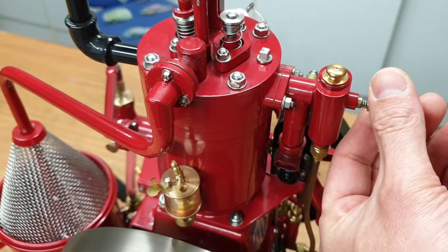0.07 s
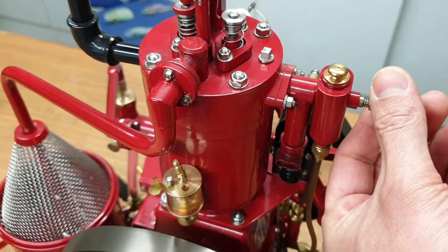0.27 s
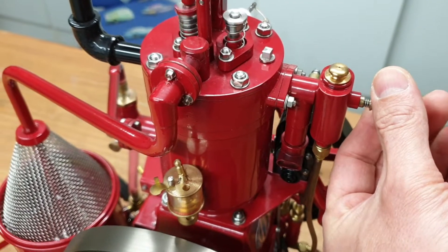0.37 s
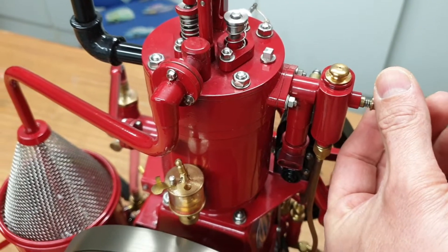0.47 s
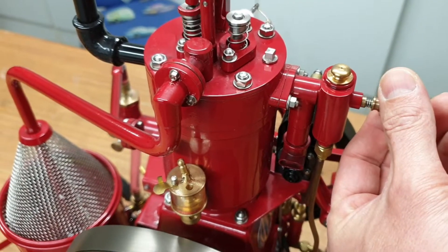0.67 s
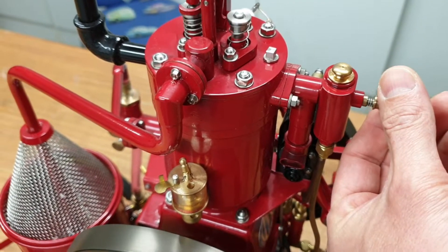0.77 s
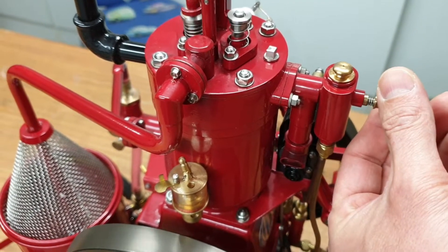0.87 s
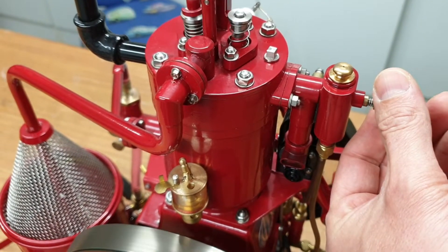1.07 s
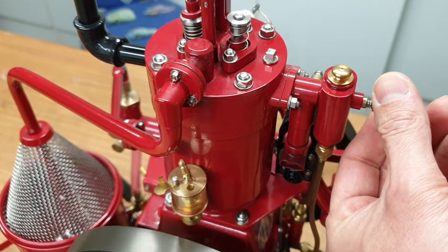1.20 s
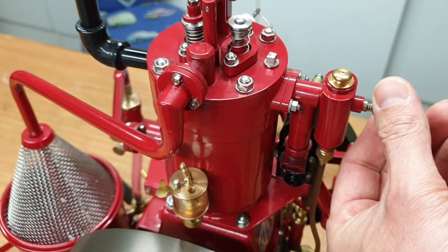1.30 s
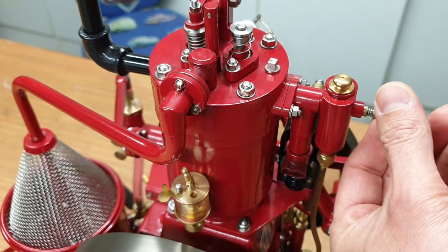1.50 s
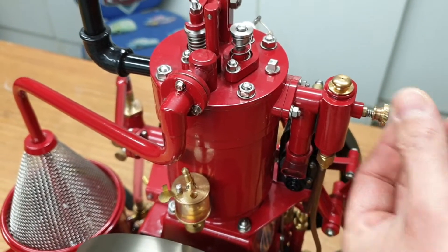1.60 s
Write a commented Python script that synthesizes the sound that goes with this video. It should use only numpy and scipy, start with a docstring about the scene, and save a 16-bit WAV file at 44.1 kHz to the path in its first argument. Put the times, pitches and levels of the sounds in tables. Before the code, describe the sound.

Close by indoors, a small model engine snorts and fires three evenly spaced, sharp pops with soft puffs between them. Its gears whirr and its metal parts tick throughout, and only these remain as it coasts.

```python
"""A small model hit-and-miss engine runs close by in a room, its gears whirring and its valve gear clattering.
On each of five suction strokes the spring-loaded intake valve flutters with a snort. After the first,
the piston knocks and the engine fires: a sharp pop rings the exhaust pipe. It fires again after the
third and fifth; the cycles between do not fire and give a soft puff.
Then the engine coasts, with only the clatter and the whirr."""
import sys
import numpy as np
from scipy import signal
from scipy.fft import rfft, irfft, next_fast_len
from scipy.io import wavfile

SR = 44100
rng = np.random.default_rng(int(sys.argv[2]) if len(sys.argv) > 2 else 0)


def materialize(psi):
    """Save the field psi as 16-bit PCM at rate SR to the path in sys.argv[1].

    A 1-D psi becomes a single channel; in a 2-D psi each row is a channel.
    """
    bounded = np.clip(np.atleast_2d(psi).T, -1, 1)
    quanta = np.round(bounded * 32767).astype(np.int16)
    wavfile.write(sys.argv[1], SR, quanta)


N = 72765
TOP_HZ = 15900  # band limit
# spectrum of air rushing through a valve (frequency [Hz], level [dB])
VALVE_HISS = [(320, -2.5), (550, -11), (729, 5.5), (927, -8.5), (1260, -8.5), (1610, 0.5), (2250, -5.5),
              (3120, -16), (3640, -0.5), (4020, -6), (5110, -8.5), (6130, -7.5), (6960, -18), (8480, -13),
              (9770, -21.5), (11400, -8), (12900, -16.5), (15300, -12), (16000, -35)]


def amp(db):
    """Amplitude ratio of a level in decibels."""
    return 10 ** (np.asarray(db) / 20)


def along(points, hz):
    """Interpolation of (frequency [Hz], value) points on a logarithmic frequency axis."""
    f, v = np.transpose(points)
    return np.interp(np.log(hz + 1), np.log(f + 1), v)


def since(s):
    """Time elapsed after an onset, zero before it."""
    return np.maximum(np.arange(N) / SR - s, 0)


def bump(s, width):
    """Gaussian pulse centred on time s."""
    return np.exp(-.5 * ((np.arange(N) / SR - s) / width) ** 2)


def filtered(x, response):
    """Linear filtering: the spectrum of x is multiplied by a frequency response."""
    m = next_fast_len(N + SR // 2)
    return irfft(rfft(x, m) * response(np.fft.rfftfreq(m, 1 / SR)), m)[..., :N]


def noise(spectrum, tilt=0):
    """Partial coherence: stereo noise of rms 1, alike in the bass and unrelated in the treble."""
    # likeness of left and right (frequency [Hz], coherence [0 to 1])
    coherence = [(60, 1), (300, 0.92), (700, 0.26), (1300, 0.014), (4000, 0.078), (15000, 0)]
    angle = lambda hz: np.arccos(np.clip(along(coherence, hz), -1, 1)) / 2
    colour = lambda hz: amp(along(spectrum, hz) + tilt * np.log(hz / TOP_HZ + .1)) * hz / (hz + 20)
    white = rng.standard_normal((2, N))
    mid, side = filtered(white, lambda hz: colour(hz) * [np.cos(angle(hz)), np.sin(angle(hz))])
    pair = np.array([mid + side, mid - side])
    return pair / pair.std()


def ring(modes, s):
    """Free vibration: damped modes of alternating polarity, struck at time s."""
    t = since(s)
    return sum((-1) ** k * amp(db - 60 * t / t60) * np.sin(2 * np.pi * hz * t)
               for k, (hz, db, t60) in enumerate(modes))


def placed(x, lead_s):
    """Path difference: the sound reaches the left microphone first."""
    return filtered(x, lambda hz: np.exp(1j * np.pi * hz * lead_s * np.array([[1], [-1]])))


def slap(modes, s, width_s, echo_s, echo):
    """Interrupted flow: a closing valve makes a rarefaction, its echo in the port and a short ring."""
    return ring(modes, s) - bump(s, width_s) - echo * bump(s + echo_s, width_s)


def room(x, wet_db, build_s=.0046):
    """Reverberation: wall reflections build up, then decay exponentially at a rate set by frequency."""
    # reverberation time (frequency [Hz], T60 [s])
    decay_times = [(80, 0.91), (300, 1), (1000, 0.19), (4000, 0.2), (14000, 0.2)]
    # spectrum of the reflections (frequency [Hz], level [dB])
    reflections = [(60, -22), (170, -24), (320, -24), (500, -16), (750, -9), (1100, -7), (2000, -4),
                   (6000, -5), (14000, -6)]
    diffuse = noise([(20, .0083), (20000, 0)])[:, :SR // 2]
    hz, t, frames = signal.stft(diffuse, SR, nperseg=256)
    t60 = along(decay_times, hz)[:, None]
    decay = amp(along(reflections, hz)[:, None] - 60 * t / t60)
    equal_energy = np.sqrt(2 * np.log(1000) / (t60 * SR))
    onset = 1 - np.exp(-(t / build_s) ** 2)
    tail = signal.istft(frames * decay * equal_energy * onset, SR, nperseg=256)[1]
    return x + amp(wet_db) * signal.fftconvolve(x, tail, axes=1)[:, :N]


def gears(whirr_db=-42, tone_db=-2, width_hz=8):
    """Gear noise: a steady broadband whirr, with narrow noise bands heard as wavering tones."""
    # spectrum of the whirr (frequency [Hz], level [dB])
    whirr = [(25, -27), (50, -4), (92, 10.5), (135, -4), (170, -5.5), (260, -4), (325, 1), (440, -5),
             (530, -16), (620, -4), (850, -4.5), (1200, -5.5), (2200, -4.5), (2800, -10), (5500, -12),
             (9000, -17.5), (16000, -22.5)]
    # gear tones (frequency [Hz], level [dB])
    hum = [(287, -53.5), (620, -54), (695, -54), (872, -56.5), (1362, -59), (2089, -62.5)]
    bands = lambda f: sum(amp(db) * np.exp(-.5 * ((f - hz) / width_hz) ** 2) for hz, db in hum)
    tones = filtered(rng.standard_normal(N), bands)
    level = np.linalg.norm([amp(db) for _, db in hum])
    return amp(whirr_db) * noise(whirr) + amp(tone_db) * level * tones / tones.std()


def valve_gear():
    """Impact and friction: cam, push rod and governor latch tick and scrape in bursts of noise."""
    # contacts (time [s], level [dB], width [s], treble tilt [dB per e-fold of frequency])
    contacts = [(.002, -32, 0.0054, -4.5), (0.012, -33, 0.0011, 17), (0.065, -35, 0.0025, 4.5),
                (0.079, -43, 0.013, 5), (0.108, -28, 0.00065, 17), (0.167, -41, 0.011, 9.5),
                (0.201, -30.5, 0.0017, 6.5), (0.207, -30, 0.0013, 22), (.306, -34.5, .002, 9),
                (0.326, -38, 0.013, 11), (0.579, -31.5, 0.0025, 2), (.931, -26, 0.0011, 18),
                (1.169, -38.5, 0.0073, 0.5), (1.254, -36, 0.0058, -7), (1.267, -32.5, 0.0039, -1.5),
                (1.339, -37.5, 0.0044, 2), (1.387, -41.5, 0.0058, -5.5), (1.426, -36.5, 0.0062, -3.5),
                (1.442, -34, 0.0044, -1.5), (1.484, -38, 0.0012, 20), (1.511, -40.5, .009, 2),
                (1.58, -41, 0.0041, 7), (1.604, -38, 0.012, -1), (1.62, -34.5, 0.0042, -3)]
    # spectrum of a contact (frequency [Hz], level [dB])
    clack = [(60, 2), (100, -30), (200, -2), (700, -5.5), (1200, -2.5), (2200, 2), (2900, -6.5), (3600, -2),
             (6000, -7.5), (9000, -14.5), (13000, -8), (16000, -23)]
    return sum(amp(db) * bump(s, width) * noise(clack, tilt) for s, db, width, tilt in contacts)


def knocks():
    """Structure-borne sound: the piston thuds through the engine bed."""
    # piston knocks (time [s], level [dB])
    impacts = [(.327, -27), (0.334, -19.5)]
    # modes of the bed (frequency [Hz], level [dB], T60 [s])
    bed_modes = [(63, 3, 0.063), (101, -0.5, 0.054)]
    return sum(amp(db) * ring(bed_modes, s) for s, db in impacts)


def puffs(lead_s=.0018, width_s=.0035):
    """Turbulent outflow: unburnt charge leaves with a short hiss and a thump."""
    # exhaust strokes without firing (time [s], thump level [dB], hiss level [dB])
    misses = [(.5335, -20, -26), (.887, -19, -27)]
    # modes of the thump (frequency [Hz], level [dB], T60 [s])
    modes = [(126, -5.5, 0.086), (178, -16, 0.14), (328, -29, 0.023), (720, -7.5, 0.084), (970, -15, 0.068),
             (1860, -15, 0.07)]
    thumps = sum(amp(db) * slap(modes, s, width_s=.00019, echo_s=.00592, echo=.6) for s, db, _ in misses)
    air = sum(amp(db) * bump(s - lead_s, width_s) for s, _, db in misses)
    return thumps + air * noise(VALVE_HISS)


def intakes(quicken_s=.000647, surge_lead_s=.0072, hiss_lead_s=.0045):
    """Flow-induced flutter: air surges and hisses through each opening, and the intake valve slaps shut."""
    # suction strokes (middle slap [s], period [s], slap level [dB], hiss level [dB], flow peak [flaps])
    strokes = [(0.2405, 0.011, -12.5, -19, -0.067), (0.4329, .0113, -11.5, -17, -0.016),
               (0.6092, 0.011, -13.5, -19.5, -0.054), (0.7879, .0109, -10.5, -18, -0.072),
               (0.9614, 0.011, -12.5, -20, -0.047)]
    # modes of the intake (frequency [Hz], level [dB], T60 [s])
    modes = [(84, -14, 0.028), (170.5, -20, 0.21), (313, -20.5, 0.096), (587, -34, 0.36),
             (689, -21.5, 0.061), (727, -35, 0.23), (877, -39, 0.18), (970, -25, 0.063), (1393, -26, 0.033),
             (1640, -19, 0.035), (1825, -30, 0.099), (1860, -31.5, 0.21)]
    slaps, air = np.zeros((2, N))
    for s, period, slap_db, hiss_db, peak in strokes:
        for flap in range(-2, 3):
            shut = s + period * flap - quicken_s * flap ** 2
            surge = amp(-4) / 2 * bump(shut - surge_lead_s, width=.0015)
            closure = slap(modes, shut, width_s=.00022, echo_s=.001287, echo=.56)
            slaps += amp(slap_db - 2.5 * (flap - peak) ** 2) * (surge + closure)
            # the hiss peaks half a flap before the slaps
            air += amp(hiss_db - 7 * (flap - peak + .5) ** 2) * bump(shut - hiss_lead_s, width=.003)
    return slaps + air * noise(VALVE_HISS)


def pops(blast_db=-.7, snap_db=-12.5, hiss_db=-19, hiss_t60=.15):
    """Impulse excitation: an exhaust blast rings the pipe as the gas jet snaps and hisses away."""
    # firings (time [s], level [dB])
    firings = [(.3579, -.8), (.7141, 0), (1.0643, 0)]
    # modes of the exhaust pipe (frequency [Hz], level [dB], T60 [s])
    pipe_modes = [(67.6, -5.7, .07), (104.8, -.4, .03), (149.3, -3.8, .04), (168.5, -10, .135),
                  (266, -30, .22), (321, -15, .14)]
    # low resonances of bench and room (frequency [Hz], level [dB], T60 [s])
    boom_modes = [(84, -23, .27), (170, -30, .33), (226, -32, .22), (321, -25, .33), (372, -33, .22),
                  (473, -34, .22)]
    # spectrum of the gas jet (frequency [Hz], level [dB])
    jet = [(470, 0), (800, -3), (1120, -7.5), (1410, -4), (1630, -4.5), (1780, -2.5), (1970, -4),
           (2210, -5), (2980, -9), (4180, -2), (4570, -4.5), (4930, -7.5), (5720, -10.5), (7080, -3),
           (8550, -11.5), (8880, -9.5), (10700, -7.5), (15000, -5.5), (16000, -9.5)]
    blast_s, blast_rise_s = .0012, .0002
    ring_lag_s, boom_rise_s, jet_rise_s = .0014, .01, .0038
    blasts, body, snaps, hiss = np.zeros((4, N))
    for s, db in firings:
        t = since(s)
        pressure = (1 - t / blast_s) * np.exp(-t / blast_s)  # compression, then rarefaction
        blasts += amp(db + blast_db) * pressure * (1 - np.exp(-t / blast_rise_s))
        boom = ring(boom_modes, s + ring_lag_s) * (1 - np.exp(-t / boom_rise_s))
        body += amp(db) * (ring(pipe_modes, s + ring_lag_s) + boom)
        snaps += amp(db + snap_db) * bump(s + jet_rise_s, width=.002) * (t > 0)
        hiss += amp(db + hiss_db - 60 * t / hiss_t60) * (1 - np.exp(-t / jet_rise_s))
    return placed(blasts, lead_s=.00032) + body + snaps * noise(jet, tilt=3) + hiss * noise(jet)


def scene():
    """Superposition: the pops and the quieter strokes reverberate over the whirr of the gears."""
    exhaust = room(pops(), wet_db=5)
    mechanism = room(intakes() + puffs() + valve_gear() + knocks(), wet_db=2.5)
    return exhaust + mechanism + gears()


def record(dry, low_hz=22):
    """Frequency response: two microphones differ in colour, shed deep bass and stop at the band limit."""
    # channel balance (frequency [Hz], left minus right [dB])
    balance = [(60, 8), (110, -0.5), (200, 2.5), (380, 0.9), (700, -0.5), (1290, -3.5), (2380, -3.5),
               (4400, -0.5), (8120, 3.5), (15000, -0.5)]
    colour = lambda hz: amp(along(balance, hz) * np.array([[.5], [-.5]]))
    low_cut = lambda hz: 1j * hz / (1j * hz + low_hz)
    return filtered(dry, lambda hz: colour(hz) * low_cut(hz) * (hz < TOP_HZ))


dry = scene()
out = record(dry)
materialize(out)
```